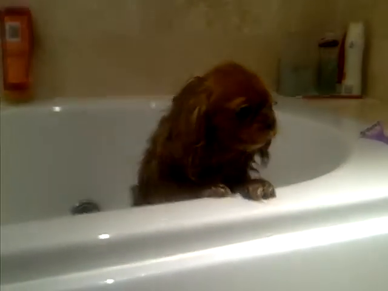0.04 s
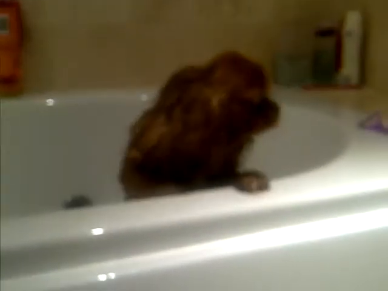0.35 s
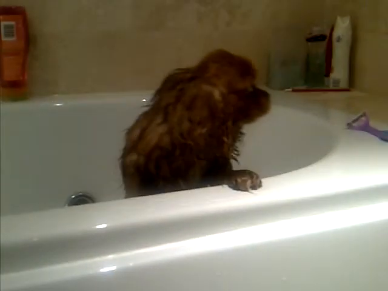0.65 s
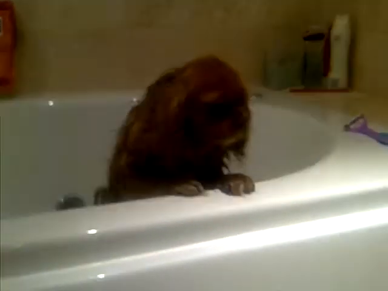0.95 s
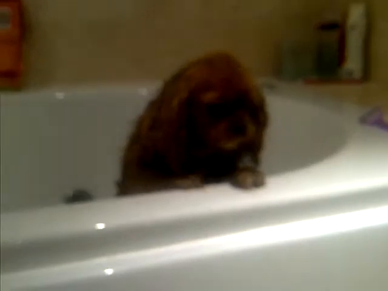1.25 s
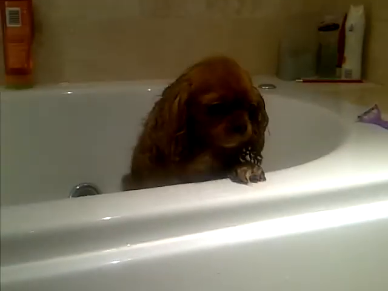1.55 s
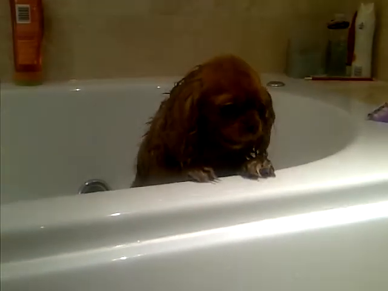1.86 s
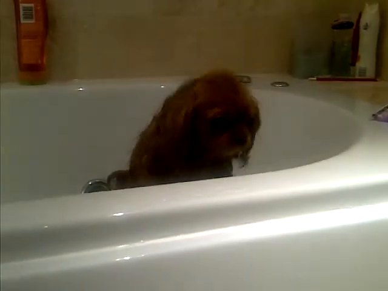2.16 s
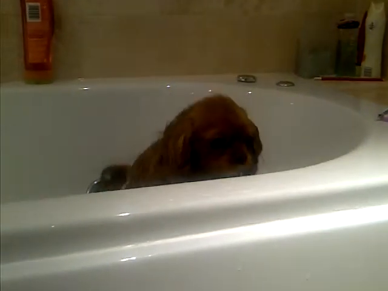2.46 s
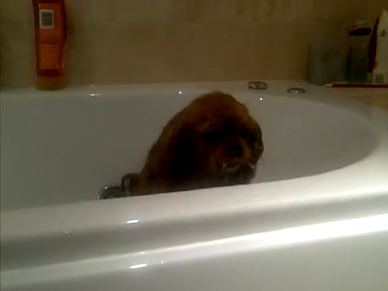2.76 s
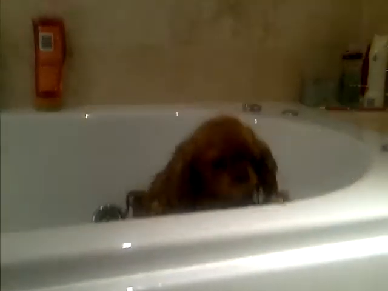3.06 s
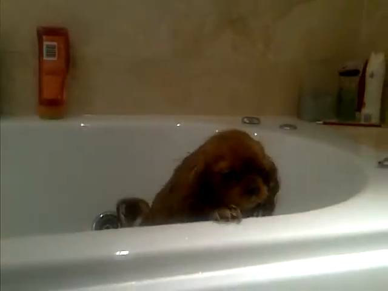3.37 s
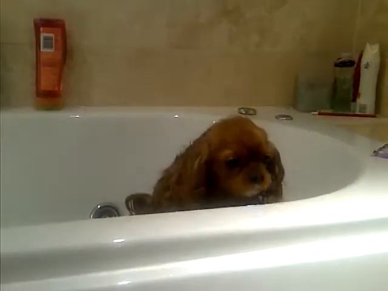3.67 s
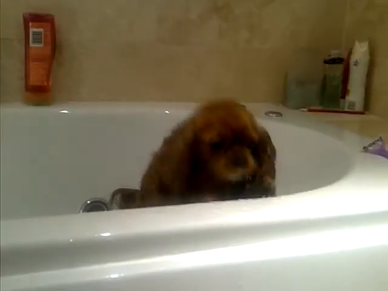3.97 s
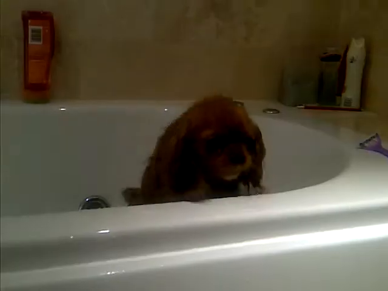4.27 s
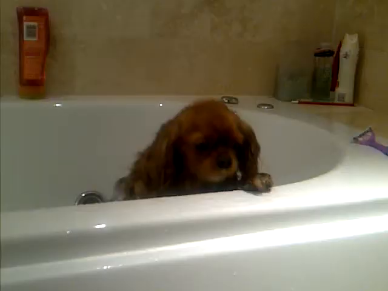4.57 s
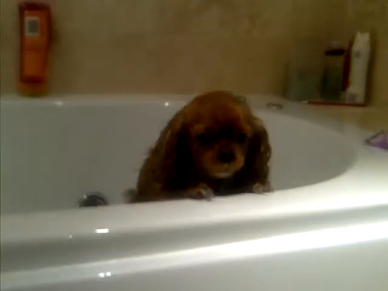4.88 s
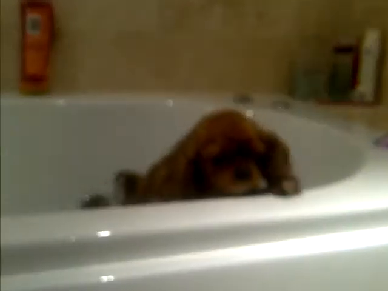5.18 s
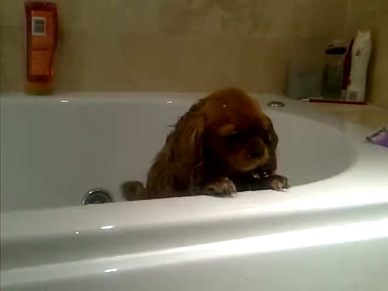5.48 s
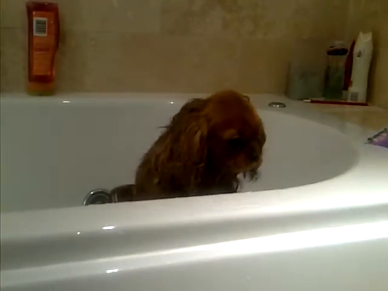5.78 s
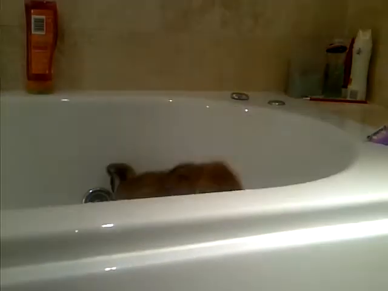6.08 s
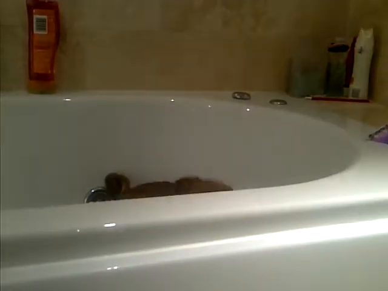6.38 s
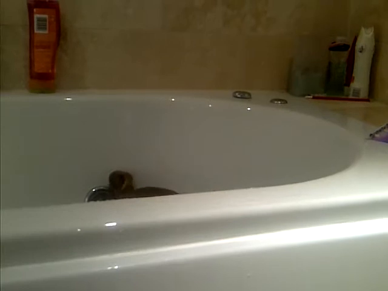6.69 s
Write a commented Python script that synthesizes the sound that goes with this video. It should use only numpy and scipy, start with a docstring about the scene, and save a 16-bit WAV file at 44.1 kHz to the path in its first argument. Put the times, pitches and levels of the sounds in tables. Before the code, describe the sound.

A small dog gives one long wavering howl and two shorter ones in an echoing bathroom, then slides down the tub with a thump.

```python
"""A small wet dog howls in a bathtub, about 0.9 m from the microphone in a small tiled bathroom.
Its vocal folds give one long wavering cry and two shorter ones, each hoarse at first, coloured by
throat and mouth. Down in the tub its claws tick and its paws knock, then it slides down the side and
lands with a thump. The hard walls ring with it all, over a mains hum and a soft hiss."""
import sys
import numpy as np
from scipy import signal
from scipy.fft import rfft, irfft, next_fast_len
from scipy.io import wavfile
from scipy.ndimage import uniform_filter1d, minimum_filter1d

SR = 44100
rng = np.random.default_rng(int(sys.argv[2]) if len(sys.argv) > 2 else 0)


def generate_wav(signal):
    """Clip the signal to [-1, 1] and save it as 16-bit WAV at the path in sys.argv[1]."""
    frames = np.transpose(np.atleast_2d(signal))
    scaled = np.clip(frames, -1, 1) * 32767
    pcm = np.round(scaled).astype(np.int16)
    wavfile.write(sys.argv[1], SR, pcm)


N = 305613
TIME = np.arange(N) / SR

# the cries, the first just dying away: (start [s], end [s], hoarseness [0-1], clears at [s])
CRIES = [(0, 0.039, 0.42, .1), (0.48, 2.54, .38, .87), (3.225, 3.93, .75, 3.42), (5.3, 6.07, 0.44, 5.68)]
# how hard the dog pushes, one curve a cry:
# (time [s], level [dB], mouth opening [0-1], fundamental against second harmonic [dB])
CRY_EFFORT = [
    [(0, -34.5, 0.5, -1), (.04, -37.5, 0.25, -1)],
    [(.46, -50, 0.1, -12), (.52, -36, .1, -6), (.6, -44, 0, -2), (.68, -39, 0, 0), (.74, -42, 0, 7),
     (.795, -44, 0, 6), (.825, -27, .03, -9), (.86, -24.5, 0.1, -10), (.91, -25.5, .62, -9),
     (.95, -27, .72, -4), (1.02, -24, .62, -5), (1.1, -28, .2, -7), (1.18, -26, 0.35, 2),
     (1.27, -29, .45, -7), (1.33, -23, .47, -5), (1.44, -22.5, .5, -7), (1.54, -25, 0.5, -2),
     (1.63, -17.5, .58, -7), (1.73, -16.5, .8, -9), (1.82, -16, 1, -5), (1.88, -11, 0.72, -4),
     (2.02, -11.5, 0.36, -9), (2.08, -20, .12, -9), (2.24, -29.5, 0.08, -4), (2.36, -29, 0, -7),
     (2.55, -31, 0.05, -3)],
    [(3.21, -42, 0, -7), (3.3, -36, 0, -6), (3.325, -30, 0, -3), (3.42, -39, 0, -2), (3.48, -28.5, .03, -3),
     (3.56, -30, 0.07, -6), (3.65, -23, 0, -10), (3.8, -24.5, .08, -2), (3.9, -29, .05, -3),
     (3.94, -32.5, 0, -5)],
    [(5.3, -45, 0, -7), (5.45, -30, 0, -4), (5.54, -33, 0, -3), (5.62, -27, .08, -8),
     (5.69, -22.5, 0.4, -9), (5.745, -25, .37, -1), (5.785, -37, .1, -1), (5.94, -34, 0, -2),
     (6.0, -47, 0, 8), (6.06, -46, 0, 14)],
]
# pitch of the voice, one curve a cry: (time [s], pitch [Hz])
CRY_PITCH = [
    [(0, 715), (.04, 695)],
    [(.47, 600), (.52, 735), (.56, 760), (.61, 810), (.655, 905), (.72, 860), (.795, 835), (.82, 716),
     (.862, 720), (.878, 756), (.91, 738), (.95, 684), (.985, 692), (1.015, 720), (1.06, 722), (1.08, 745),
     (1.16, 733), (1.18, 718), (1.22, 714), (1.24, 692), (1.29, 692), (1.315, 680), (1.35, 668),
     (1.42, 688), (1.5, 682), (1.54, 664), (1.68, 670), (1.765, 679), (1.79, 694), (1.85, 693), (1.88, 670),
     (1.99, 662), (2.06, 640), (2.13, 632), (2.27, 636), (2.35, 720), (2.55, 712)],
    [(3.21, 665), (3.32, 680), (3.38, 600), (3.44, 585), (3.485, 646), (3.53, 610), (3.58, 617),
     (3.62, 639), (3.69, 640), (3.72, 708), (3.77, 693), (3.81, 692), (3.85, 662), (3.92, 680), (3.96, 660)],
    [(5.3, 560), (5.36, 640), (5.415, 700), (5.45, 795), (5.49, 845), (5.54, 900), (5.575, 810),
     (5.625, 765), (5.665, 712), (5.71, 738), (5.755, 772), (5.8, 742), (5.94, 725), (6.0, 690),
     (6.06, 684)],
]
# two low throat resonances that carry the first two harmonics: (frequency [Hz], gain [dB])
LOW_THROAT = [(600, -6.5), (650, -4.5), (690, 1.5), (750, 3), (900, 1.5), (1230, -3), (1380, -0.5),
              (1540, -2.5), (1800, -6.5)]

def howl(belt_db=-21, give_way=.52, quaver_db=2.0, waver=.0037):
    """Vocal folds give a stack of harmonics; hoarseness shakes their pitch and strength."""
    level_db, mouth, fundamental_db = curves(sum(CRY_EFFORT, []))
    # past belt_db all further effort goes into the second harmonic, and the others give way
    drive_db = np.minimum(level_db, belt_db) - give_way * np.maximum(level_db - belt_db, 0)
    hoarse = hoarseness(level_db)
    jitter = hoarse * (.04 * walk(260) + .025 * walk(70))
    shimmer = .55 * hoarse * walk(350)
    pitch = curves(sum(CRY_PITCH, []))[0] * (1 + waver * walk(55))
    phase = 2 * np.pi * np.cumsum(pitch * (1 + jitter)) / SR
    first_gain = undb(drive_db + fundamental_db + at_hz(LOW_THROAT, pitch) + quaver_db * walk(22))
    second_gain = undb(level_db + at_hz(LOW_THROAT, 2 * pitch))
    voice = first_gain * np.sin(phase) + second_gain * np.sin(2 * phase)
    voice += overtones(pitch, phase, drive_db, mouth)
    voice += breath(phase, drive_db, mouth)
    voice += second_gain * rasp(hoarse)
    crying = sum(gate(start, end) for start, end, _, _ in CRIES)
    return np.sqrt(2) * voice * (1 + shimmer) * crying + whine(phase)


# colour of throat and mouth, wide open and shut: (frequency [Hz], gain [dB])
MOUTH_OPEN = [(1800, -5), (1950, -4), (2050, 12), (2230, 9), (2400, 0), (2720, -4), (2950, 0), (3350, 0),
              (3700, -9), (4100, -10), (4560, -16), (4735, -8), (4900, -13), (5400, -23), (6100, -24.5),
              (7000, -39)]
MOUTH_SHUT = [(1850, -14), (1960, -23), (2100, -25), (2300, -30), (2720, -40), (3400, -40), (4500, -42),
              (5400, -39), (6100, -35), (7000, -51)]
# an upper throat resonance moved by the tongue: (time [s], centre [Hz])
TONGUE = [(.04, 2850), (.85, 3650), (1.3, 3750), (1.52, 3700), (1.62, 3350), (1.77, 2950), (1.82, 2800),
          (1.87, 3350), (2.4, 3300), (3.5, 2350), (3.7, 3100), (3.82, 2720), (5.675, 3550), (5.705, 2950),
          (5.735, 3700)]

def overtones(pitch, phase, drive_db, mouth, tongue_db=8, tongue_width_hz=280):
    """Harmonics 3 to 10: an open mouth lets them out, and the tongue lifts those near its resonance."""
    tongue_hz = curves(TONGUE)[0]
    out = np.zeros(N)
    for k in range(3, 11):
        hz = k * pitch
        db = drive_db + mouth * at_hz(MOUTH_OPEN, hz) + (1 - mouth) * at_hz(MOUTH_SHUT, hz)
        db += tongue_db * np.exp(-((hz - tongue_hz) / tongue_width_hz) ** 2)
        if k == 3:  # the third has a ceiling, which sinks once the jaw gapes
            ceiling_db = -27 - 14 * np.maximum(mouth - .55, 0)
            db = np.minimum(db, ceiling_db)
        flutter_db = 2 * walk(25) + 2 * walk(70)  # small moves of tongue and lips
        out += undb(db + flutter_db) * np.sin(k * phase)
    return out


def breath(phase, drive_db, mouth, air_db=-27):
    """Air leaves the open mouth, one puff for each cycle of the folds."""
    air = colour(rng.standard_normal(N), [(100, -40), (300, -21.5)] + MOUTH_OPEN)
    return undb(drive_db + air_db) * mouth ** 2 * air * (1 + np.cos(phase))


# the voice cracks for an instant: (time [s], half length [s], hoarseness [0-1])
VOICE_CRACKS = [(.875, .014, .65), (.965, .015, .4), (3.34, .025, .95), (3.48, .02, .6), (5.765, .03, .72)]

def hoarseness(level_db, clearing_s=.03, full_cry_db=-9, hoarse_per_db=.0115):
    """Each cry is rough until it clears; after that, the louder the cleaner, except where it cracks."""
    lingering = hoarse_per_db * np.maximum(full_cry_db - level_db, 0)
    rough = sum(amount * gate(start, end) * (1 - np.tanh((TIME - clears) / clearing_s)) / 2
                for start, end, amount, clears in CRIES)
    cracks = sum(amount * np.exp(-((TIME - s) / half) ** 2) for s, half, amount in VOICE_CRACKS)
    return np.clip(np.max([lingering, rough, cracks], axis=0), 0, 1)


# turbulent air in the throat: (frequency [Hz], gain [dB])
RASP_SPECTRUM = [(150, -45), (400, -28), (620, -8), (790, 1), (1000, -12), (1380, 2.5), (1650, -7),
                 (2000, -14.5), (3000, -30), (7000, -47.5)]

def rasp(hoarse, gain_db=-3):
    """The air in the throat turns turbulent when the voice breaks."""
    return undb(gain_db) * hoarse ** 2 * colour(rng.standard_normal(N), RASP_SPECTRUM)


# thin tones in the throat as the voice breaks: (start [s], length [s], pitch [Hz], level [dB])
WHINES = [(3.215, 0.03, 1590, -47), (3.335, 0.025, 1460, -35), (3.46, 0.03, 1445, -32),
          (3.515, .025, 1530, -38)]

def whine(fold_phase, chop=.5):
    """A second, independent whine, which the folds chop into side tones."""
    return whistles(WHINES, jitter=.024, arch=.013) * (1 + chop * np.cos(fold_phase))


# claws and pads on the tub, ending with the heavy landing:
# (time [s], click level [dB], knock level [dB], brightest part of the click [Hz], scuff t60 [s])
STEPS = [(2.401, -55, -59.5, 2200, .04), (2.525, -44, -42, 2000, .04), (2.541, -42.5, -60, 5000, .05),
         (2.775, -50, -64, 5800, .04), (2.868, -51, -45, 4400, .03), (2.877, -44, -42, 3000, .02),
         (2.895, -50, -44, 4600, .06), (3.026, -47, -62, 3100, .22), (3.33, -48, -44, 5400, .04),
         (4.271, -55, -52, 3000, .08), (4.545, -52.5, -66, 4500, .06), (4.757, -57.5, -54, 3000, .06),
         (5.192, -51, -55, 4400, .1), (6.068, -40, -48, 4400, .045), (6.224, -43.5, -50, 3800, .06),
         (6.375, -52, -38.5, 1300, .02), (6.389, -48, -47, 4200, .07), (6.664, -62, -37, 1000, .04),
         (6.672, -50, -26.5, 1300, .04), (6.69, -47.5, -30, 2800, .06), (6.756, -54, -38.5, 1300, .05),
         (6.843, -57, -44, 1300, .04)]
# scratch of a claw: (frequency [Hz], gain [dB])
CLAW_SPECTRUM = [(300, -1.5), (1200, 4), (2500, 0), (4000, -1), (5300, -1), (6500, -4), (7600, -24)]
# ring of the tub shell: (frequency [Hz], level [dB], t60 [s])
TUB_MODES = [(190, -12, .1), (275, -12, 0.15), (335, -11, 0.15), (490, -2, 0.04), (680, 3, 0.03),
             (832, 4, 0.04), (1030, 2, 0.039), (1103, 5, 0.037), (1200, -5, 0.065), (1360, 4, 0.037),
             (1800, -27.5, 0.076), (2570, -21, 0.11)]

def paws(push_t60=.05, click_trim_db=-6, knock_trim_db=-8, bright_db=4.5, spatter_db=6):
    """Each step is a wet, spattering scuff of the claws and a soft push that rings the tub."""
    t = np.arange(SR // 4) / SR
    out = np.zeros(N)
    ring = sum(undb(db - 60 * t / t60) * np.cos(2 * np.pi * hz * t) for hz, db, t60 in TUB_MODES)
    ring = signal.sosfilt(signal.butter(2, [260, 4500], "band", fs=SR, output="sos"), ring)
    for s, claw_db, pad_db, bright_hz, scuff_t60 in STEPS:
        touch = 1 - np.exp(-t / (.1 * scuff_t60))  # the shorter the scuff, the sharper it starts
        scratch, push = rng.standard_normal((2, len(t)))
        spatter = undb(spatter_db * walk(400)[:len(t)])
        scratch = colour(scratch * spatter, CLAW_SPECTRUM)
        peak = [(bright_hz / np.sqrt(2), 0), (bright_hz, bright_db), (bright_hz * np.sqrt(2), 0)]
        click = unit(colour(scratch, peak) * touch * undb(-60 * t / scuff_t60))
        force = push * touch * undb(-60 * t / push_t60)
        knock = unit(signal.fftconvolve(force, ring)[:len(t)])
        add(out, s, click * undb(claw_db + click_trim_db) + knock * undb(pad_db + knock_trim_db))
    return out


# the dog's weight drops on the tub floor: (time [s], pitch [Hz], level [dB])
THUDS = [(6.068, 175, -50), (6.71, 270, -47)]

def thuds(t60=.055, rise_s=.006):
    """The tub floor booms briefly under the dog's weight."""
    t = np.arange(SR // 4) / SR
    envelope = (1 - np.exp(-t / rise_s)) * undb(-60 * t / t60)
    out = np.zeros(N)
    for s, hz, db in THUDS:
        spectrum = [(hz / 4, -44), (hz / 2, -22), (hz, 0), (2 * hz, -22), (10 * hz, -44)]
        boom = colour(rng.standard_normal(len(t)), spectrum)
        add(out, s, unit(boom * envelope) * undb(db))
    return out


# wet paws sliding down the tub: (start [s], length [s], level [dB])
SCRAPES = [(6.23, .1, -48), (6.39, 0.11, -34), (6.51, .07, -41.5), (6.59, .075, -43), (6.68, 0.089, -37),
           (6.86, .07, -46)]
# pads and fur rubbing the tub wall: (frequency [Hz], gain [dB])
RUB_SPECTRUM = [(100, -31), (200, -15), (500, -10), (800, 5), (1150, 11), (1500, 1.5), (1900, -4),
                (2500, -4), (3500, -9), (5500, -16), (7500, -26)]

def slide(slips_per_s=700, uneven_db=4.0, fade_db_per_s=42):
    """Dense little slips of wet pads and fur on the tub wall; each scrape bites, then eases off."""
    slips = (rng.random(N) < slips_per_s / SR) * rng.standard_normal(N)
    pressure = sum(undb(db - fade_db_per_s * np.maximum(TIME - start, 0)) * gate(start, start + length)
                   for start, length, db in SCRAPES)
    return colour(slips, RUB_SPECTRUM) * pressure * undb(uneven_db * walk(50))


# pads slipping on the tub: (start [s], length [s], pitch [Hz], level [dB])
PAD_SQUEAKS = [(6.56, .045, 2330, -45), (6.905, .03, 2000, -49)]

def squeaks():
    """A pad squeaks as it slips."""
    return whistles(PAD_SQUEAKS, jitter=.028, arch=.05)


# placement in the bathroom, one row an axis: (room size [m], dog [m], microphone [m])
PLACEMENT = [(2.51, 1.12, 1.27), (2.1, .42, 1.22), (2.47, .67, 1.02)]

def wall_echoes(order=24, sound_m_per_s=343):
    """Mirror images of the dog in six hard surfaces reach the microphone; late echoes turn to noise."""
    n = np.arange(-order, order + 1)
    offsets = [n * size + np.where(n % 2, size - dog, dog) - mic for size, dog, mic in PLACEMENT]
    metres = np.sqrt(sum(d ** 2 for d in np.ix_(*offsets)))
    sign = (-1.) ** sum(np.ix_(n, n, n))
    lag = np.rint((metres - metres.min()) / sound_m_per_s * SR).astype(int)
    early = np.bincount(lag.ravel(), (sign / metres).ravel())[:SR // 7]
    early[0] = 0  # the direct path is no echo
    return np.concatenate([unit(early), rng.standard_normal(SR - len(early))])


# ring of the tiled room: (frequency [Hz], t60 [s])
ROOM_DECAY = [(150, 0.52), (700, 0.61), (1500, 0.56), (3000, 0.6), (7000, 0.58)]

def bathroom(x, reflections, wet_db):
    """The microphone hears the direct sound, then echoes that fade at their own rate in each band."""
    t = np.arange(SR) / SR
    hz = np.fft.rfftfreq(SR, 1 / SR)
    centres, t60s = np.transpose(ROOM_DECAY)
    bands = [irfft(rfft(reflections) * np.interp(hz, centres, share), SR)
             for share in np.eye(len(centres))]
    tail = sum(band * undb(-60 * t / t60) for band, t60 in zip(bands, t60s))
    response = undb(wet_db) * tail / np.linalg.norm(tail)
    response[0] = 1  # the direct path
    return signal.fftconvolve(x, response / np.linalg.norm(response))[:N]


# faint low tones that hang in the room: (frequency [Hz], level [dB])
DRONES = [(398, -63), (555, -63.5)]
# soft hiss behind the dog: (frequency [Hz], gain [dB])
HISS_SPECTRUM = [(60, -18), (130, -18.5), (165, -5), (250, -12), (400, -5), (560, -8), (720, -13.5),
                 (1200, -11.5), (1800, -18), (3000, -26), (4300, -28), (5600, -25), (7400, -44)]

def room_tone(hum_hz=100, hum_db=-58.5, hiss_db=-51.5, waver=.79):
    """Mains hum, faint wavering tones and a soft, steady hiss."""
    hum = np.sqrt(2) * np.sin(2 * np.pi * hum_hz * TIME)
    drone = sum(undb(db) * (1 + waver * walk(8)) * np.sin(2 * np.pi * hz * TIME + 2 * walk(10))
                for hz, db in DRONES)
    hiss = colour(rng.standard_normal(N), HISS_SPECTRUM)
    return undb(hum_db) * hum + drone + undb(hiss_db) * hiss


def whistles(rows, jitter, arch):
    """Short unsteady tones; each rises in pitch by the share arch and falls back."""
    out = np.zeros(N)
    for start, length, hz, db in rows:
        bend = arch * np.sin(np.pi * np.clip((TIME - start) / length, 0, 1))
        phase = 2 * np.pi * np.cumsum(hz * (1 + bend + jitter * walk(200))) / SR
        out += np.sqrt(2) * np.sin(phase) * undb(db) * gate(start, start + length)
    return out


def undb(db):
    """Decibels to gain."""
    return np.exp(np.asarray(db) * (np.log(10) / 20))


def unit(x):
    """Scale to rms 1."""
    return x / np.sqrt(np.mean(x ** 2) + 1e-18)


def curves(rows):
    """Each column of a table, joined by straight lines in time."""
    s, *columns = np.transpose(rows)
    return [np.interp(TIME, s, c) for c in columns]


def gate(start, end, fade=.015):
    """One while a sound lasts, with soft ends."""
    return np.clip(np.minimum(TIME - start, end - TIME) / fade + 1, 0, 1)


def at_hz(points, hz):
    """Read (Hz, value) points on a log-frequency axis."""
    f, value = np.transpose(points)
    return np.interp(np.log(hz + 1), np.log(f), value)


def colour(x, points):
    """Give a sound a smooth spectrum; rms 1."""
    size = next_fast_len(len(x))
    gain = undb(at_hz(points, np.fft.rfftfreq(size, 1 / SR)))
    return unit(irfft(rfft(x, size) * gain, size)[:len(x)])


def walk(rate):
    """Smooth chance that changes about rate times a second; spread 1."""
    hold = max(int(SR / rate), 1)
    steps = np.repeat(rng.standard_normal(N // hold + 1), hold)[:N]
    return unit(uniform_filter1d(uniform_filter1d(steps, hold), max(hold // 2, 1)))


def add(out, s, sound):
    """Mix a short sound in at time s."""
    i = int(s * SR)
    out[i:i + len(sound)] += sound[:N - i]


def scene():
    """The dog cries over the rim at the microphone; its feet, down in the tub, are heard scattered."""
    feet = paws() + thuds() + slide() + squeaks()
    scattered = rng.standard_normal(SR)
    voice_at_mic = bathroom(howl(), wall_echoes(), wet_db=4)
    feet_at_mic = bathroom(feet, scattered, wet_db=9.5)
    return (voice_at_mic + feet_at_mic + room_tone())[None]


def record(dry, low_hz=35, top_hz=7150, limit_peak=.48, hold_s=.035):
    """A small camera's mono microphone, narrow in band; a limiter holds down the peak of the howl."""
    low_cut = signal.sosfilt(signal.butter(2, low_hz, "high", fs=SR, output="sos"), dry)
    hold = int(hold_s * SR)
    needed_gain = limit_peak / np.maximum(abs(low_cut), limit_peak)
    gain = uniform_filter1d(minimum_filter1d(needed_gain, hold), hold)
    return signal.sosfilt(signal.ellip(7, .3, 70, top_hz, fs=SR, output="sos"), low_cut * gain)


dry = scene()
out = record(dry)
generate_wav(out)
```